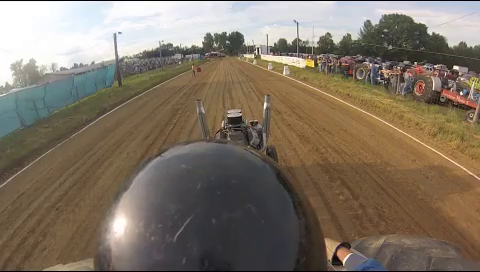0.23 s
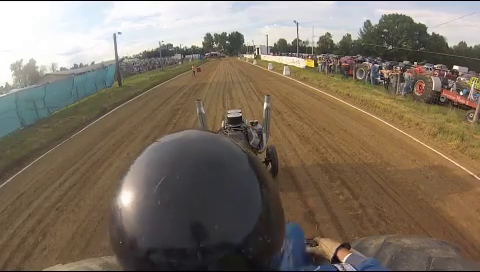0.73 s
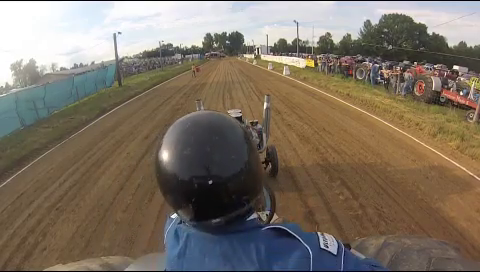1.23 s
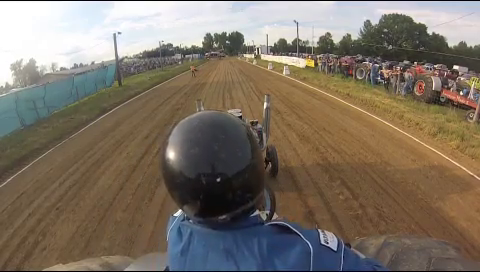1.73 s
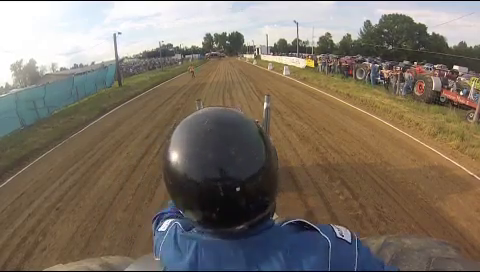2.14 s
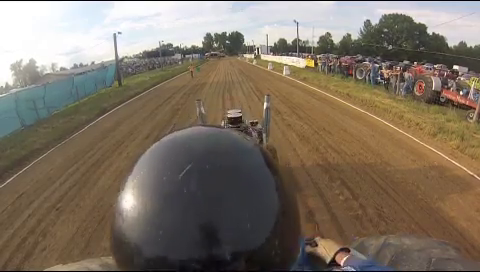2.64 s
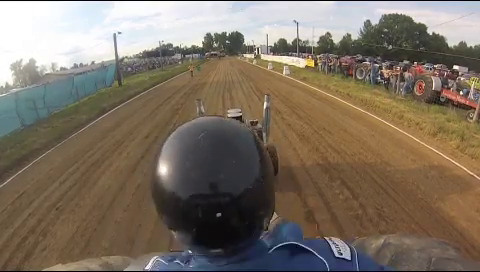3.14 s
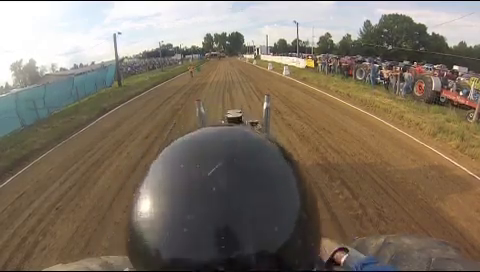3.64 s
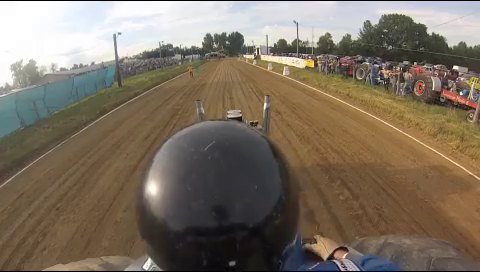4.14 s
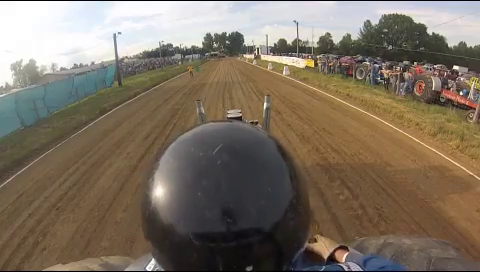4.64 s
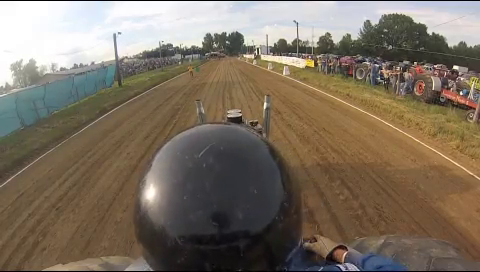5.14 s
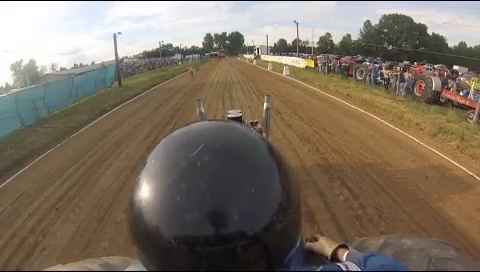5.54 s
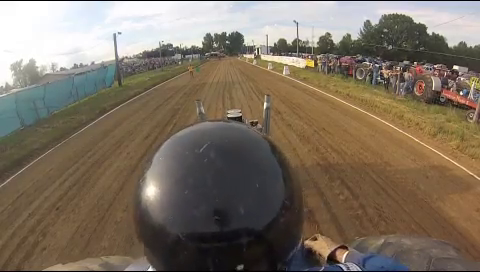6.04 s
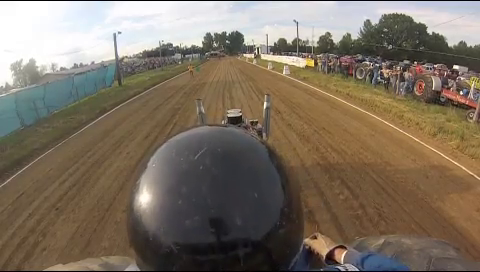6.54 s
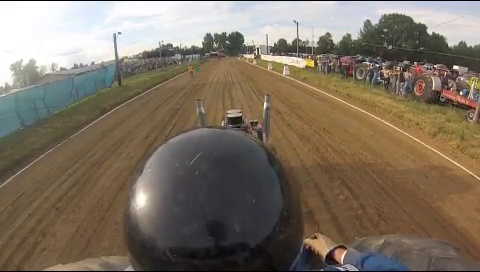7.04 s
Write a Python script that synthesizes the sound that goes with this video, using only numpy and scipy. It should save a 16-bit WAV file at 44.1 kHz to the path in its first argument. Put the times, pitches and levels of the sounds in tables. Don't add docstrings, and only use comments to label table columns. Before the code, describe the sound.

A powerful eight-cylinder tractor engine is heard from a camera clamped to the frame behind the driver, mostly as vibration through the mount into a sealed plastic case. From 0 to about 4.2 s it idles: a low, boomy drone, almost steady in pitch, with uneven swells and sags, brief singing of a thin bracket, ringing tubes, and rough gear and valve clatter. A loose part taps irregularly, with sharper ticks scattered until about 4.5 s. From roughly 4.3 s the engine picks up and its pitch climbs smoothly, while the deep boom flutters and drops back. Around 6.3 to 6.7 s a hard throttle stab drives the revs up fast; clatter, bright buzzing rattle and leaking open exhaust swell together. It ends near 7.3 s still rising, at its loudest, over twice the idle pitch. Close, dry and boxy, without echo.

```python
import sys
import numpy as np
from scipy import signal
from scipy.fft import rfft, irfft, next_fast_len
from scipy.io import wavfile
from scipy.ndimage import uniform_filter1d

SR = 44100
rng = np.random.default_rng(int(sys.argv[2]) if len(sys.argv) > 2 else 0)


def to_linear_factor(level_db):
    exponent = np.asarray(level_db, float) / 20
    return 10 ** exponent


def to_wav(s):
    ch = np.atleast_2d(s).T
    pcm = np.round(np.clip(ch, -1, 1) * 32767)
    wavfile.write(sys.argv[1], SR, pcm.astype(np.int16))


N = 321048
TIME = np.arange(N) / SR


def curves(table):
    s, *columns = np.transpose(table)
    return [np.interp(TIME, s, column) for column in columns]


def steady(x, span_s=0.2):
    k = int(span_s * SR)
    power = uniform_filter1d(uniform_filter1d(x ** 2, k), k)
    return x / np.sqrt(power + 1e-18)


def unit(x):
    return x / np.sqrt(np.mean(x ** 2))


def band(x, low_hz, high_hz):
    return signal.sosfilt(signal.butter(3, [low_hz, high_hz], "bandpass", fs=SR, output="sos"), x)


def ring(x, hz, width_hz):
    return signal.lfilter(*signal.iirpeak(hz, hz / width_hz, fs=SR), x)


def rings(x, modes):
    total = 0
    for k, (hz, width_hz, db) in enumerate(modes):
        total = total + (-1) ** k * to_linear_factor(db) * ring(x, hz, width_hz)
    return total


def decay(x, fall_s):
    return signal.lfilter([1], [1, -np.exp(-1 / (fall_s * SR))], x)


def colour(x, points):
    hz, db = np.transpose(points)
    size = next_fast_len(N)
    log_hz = np.log(np.arange(1, size // 2 + 2) * SR / size)
    gain = to_linear_factor(np.interp(log_hz, np.log(hz), db))
    return irfft(rfft(x, size) * gain, size)[:N]


def walk(rate):
    knots = rng.standard_normal(int(N / SR * rate) + 2)
    return 1.2 * np.interp(TIME * rate, np.arange(len(knots)), knots)


def bumps(rows):
    return sum(db * np.exp(-((TIME - s) / half_s) ** 2) for s, db, half_s in rows)


# [t/s, firing rate f/Hz]
REVS = [(0.0, 119.1), (0.3, 119.3), (0.9, 116.9), (1.3, 117.1), (1.8, 116.6), (2.5, 118.4), (3.05, 117.5),
        (3.6, 118.1), (4.0, 118.5), (4.25, 121.3), (4.72, 137.5), (5.25, 153.7), (5.8, 167.8),
        (6.16, 174.3), (6.32, 179.4), (6.68, 223.2), (6.96, 249.5), (7.28, 268.7)]


def firing_rate():
    return curves(REVS)[0]


def octaves():
    return np.log2(firing_rate() / REVS[0][1])


# [t/s, opening 0-1]
THROTTLE = [
    (0, 0.03),
    (4.2, 0),
    (4.55, 0.12),
    (5.6, .15),
    (6.3, 0.24),
    (6.72, 0.71),
    (6.9, 0.68),
    (7.28, 1),
]


def law(idle_db, octave_db, open_db):
    return idle_db + octave_db * octaves() + open_db * curves(THROTTLE)[0]


def harmonics(firings, table, wander_db):
    total = 0
    for k, db in table:
        level = to_linear_factor(db + wander_db * walk(10))
        total = total + level * np.sin(2 * np.pi * (k * firings / 8 + rng.random()))
    return total


def crests(crest, lines, floor_db):
    hz, below_hz, above_hz = crest
    power = to_linear_factor(floor_db) ** 2
    for k, db in lines:
        off_hz = np.round(k) * firing_rate() / 8 - hz
        skirt_hz = np.where(off_hz < 0, below_hz, above_hz)
        power = power + to_linear_factor(db) ** 2 / (1 + (off_hz / skirt_hz) ** 2) ** 2
    return np.sqrt(power)


# [multiple of the eight-firing cycle, level/dB]
SHAKE_LINES = [(1, -10), (2, -8), (3, -18), (4, -6), (5, -9), (6, -7), (7, -11), (8, 0), (9, -11),
               (10, -11), (11, -18), (12, -14), (14, -14), (16, -7), (18, -14), (20, -17), (21, -15),
               (22, -14), (23, -18), (24, -13), (26, -14), (28, -17), (29, -18), (30, -16), (32, -14)]


def shake(firings, load_db=3):
    noise = unit(band(rng.standard_normal(N), 15, 900))
    rumble = to_linear_factor(-2.5 - load_db * octaves()) * noise
    force = harmonics(firings, SHAKE_LINES, wander_db=2.2) + rumble
    return signal.lfilter(*signal.iirnotch(149, 5, fs=SR), force)


# [multiple of the cycle, level/dB at the crest]
ARM_LINES = [(2, -38), (1, -40)]


def arm(force):
    hz = 29.7
    sway = steady(ring(ring(ring(force, hz, 3.6), hz, 7), hz, 12))
    gain = crests((30, 2.76, 3.1), ARM_LINES, law(idle_db=-48, octave_db=1.5, open_db=1.5))
    gather_db = -14 * np.exp(-TIME / 1.6)
    return band(sway * gain * to_linear_factor(gather_db + walk(7)), 15, 35)


# [multiple of the cycle, level/dB at the crest]
MOUNT_LINES = [(8, -17.5), (7, -30), (6, -37.5), (5, -20), (4, -19)]
# [t/s, level/dB, half length/s]
STUMBLES = [(.37, -1.5, 0.041), (1.34, -1.5, .06), (1.53, -2, 0.063), (1.71, 0, 0.055), (2.12, -3.5, 0.033),
            (2.39, -3.5, 0.041), (2.6, -9.5, .04), (2.86, -5, 0.043), (3.06, -1, 0.044), (3.21, -3, 0.046),
            (3.47, -3, 0.049), (3.65, -4.5, 0.056), (3.99, -5, 0.025), (4.17, -4, 0.11), (4.54, -9, 0.089),
            (4.78, -12, .04), (5.13, -6, .03), (5.29, -9, 0.029), (5.37, -13, .025), (5.45, -18, .025),
            (5.54, -19, 0.032), (5.75, -8, 0.043), (6.0, -20, 0.022), (6.18, -3, .03), (6.26, 0.5, 0.034),
            (6.37, -11, .03), (6.47, -9.5, 0.036), (6.61, 1, .035), (6.73, -4, 0.025), (6.85, -8, 0.017)]
# [t/s, level/dB, half length/s]
SURGES = [
    (0.446, 2, .05),
    (1.415, 2.5, 0.036),
    (1.635, 4, 0.025),
    (2.24, 2.5, 0.27),
    (2.48, 2, .05),
    (2.933, 3, .04),
    (4.66, 4, 0.022),
    (6.126, 2.5, .04),
    (6.681, 5.5, 0.03),
]


def mount(force, firings):
    hz = 119.8
    lead = np.searchsorted(firings, 32)
    running = np.r_[force[:lead], force]
    boom = steady(ring(ring(running, hz, 11), hz, 30), 0.06)[lead:]
    gain = crests((126.7, 8.35, 3.35), MOUNT_LINES, law(idle_db=-34, octave_db=5.1, open_db=3.3))
    return band(boom * gain * to_linear_factor(bumps(STUMBLES + SURGES)), 63, 450)


# [multiple of the cycle, level/dB at the crest]
BRACKET_LINES = [(18, -39), (16, -36.5), (14, -42), (12, -35), (10, -30.5), (9, -34.5)]
# [t/s, level/dB, half length/s]
BRACKET_SONGS = [(.14, 8.5, 0.068), (.5, 5.5, 0.14), (.88, 11.5, .1), (1.22, 9, 0.089), (1.45, 8.1, 0.084),
                 (1.87, 8.5, .12), (2.62, 10, 0.062), (2.74, 7, 0.054), (3.2, 4, .2), (3.75, 5.5, 0.18),
                 (4.15, 11.7, 0.16), (5.3, 5, 0.079), (6.06, 5, 0.061)]


def bracket(force):
    hz = 286
    tone = steady(ring(ring(force, hz, 4.2), hz, 59), 0.11)
    floor_db = law(idle_db=-50.5, octave_db=8.6, open_db=1.9) + bumps(BRACKET_SONGS)
    return tone * crests((287, 4.8, 18), BRACKET_LINES, floor_db)


# [f/Hz, width/Hz, level/dB]
TUBES = [(85, 5.6, 8), (161, 31, -10.5), (211, 8.6, -7.5), (248, 19.2, -3), (461.2, 18.5, -1),
         (480, 15, -25)]
# [f/Hz, level/dB]
BETWEEN = [(45, -42), (75, -32), (170, 9.5), (330, -19.5), (600, -7), (900, -11), (1600, -24.5),
           (2400, -1.5), (2900, -5), (3500, -28)]


def tubes(force):
    ringing = unit(band(rings(force, TUBES), 97, 920))
    passed = unit(colour(force, BETWEEN[:5] + [(900, 0.5)]))
    level_db = law(idle_db=-46.5, octave_db=8.38, open_db=2) + 5.5
    return to_linear_factor(level_db) * steady(ringing + to_linear_factor(2) * passed, 0.83)


def frame(firings):
    force = shake(firings)
    return arm(force) + mount(force, firings) + bracket(force) + tubes(force)


# [share of the cycle, level/dB]
VALVE_KNOCKS = [
    (.09, -7),
    (.2, 0),
    (.39, 0),
    (.44, -7),
    (.62, -8),
    (.85, -3),
    (.93, -5),
]


def valves(firings):
    share, db = np.transpose(VALVE_KNOCKS)
    cycles = np.arange(int(firings[-1] / 8) + 1)[:, None]
    chance = rng.standard_normal((2, len(cycles), len(share)))
    at = np.searchsorted(firings / 8, cycles + share + 0.003 * chance[0])
    knocks = np.zeros(N + 1)
    knocks[at] = to_linear_factor(db + 1.2 * chance[1])
    return knocks[:N]


WALL_HZ = [723, 960, 1099, 1345, 1508, 1850, 2108, 2229, 2295, 2404, 2730]
# [width/Hz, level/dB]
WALLS = [(35.4, -2.5), (21.3, -2.5), (24.2, -2.5), (70, -0.5), (48, -3.5), (84, 0), (26.3, -3), (41, 1.5),
         (50.7, -8.5), (45, -15.5), (23.8, 1)]


def case_walls(roar, knocks):
    hits = steady(band(knocks, 2050, 2550)) * np.sqrt(650 / (SR / 2))
    drive = roar + to_linear_factor(6) * hits
    modes = [(hz, *wall) for hz, wall in zip(WALL_HZ, WALLS)]
    ringing = unit(band(rings(drive, modes), 222, 6050))
    skirt = [(300, 1.5)] + BETWEEN[4:] + [(6000, -35), (11000, -55)]
    passed = unit(colour(drive, skirt))
    return to_linear_factor(law(idle_db=-37.5, octave_db=8.76, open_db=1.4)) * steady(ringing + to_linear_factor(-8.5) * passed)


# [f/Hz, width/Hz, level/dB]
LID = [(3290, 17, 2), (3617, 90, 5), (3968, 58, 3.5), (4300, 63, -4), (4590, 17, 4.5), (5010, 67, -1.5),
       (5614, 34, 5.5), (6600, 90, 10.5)]


def case_lid(roar):
    ringing = unit(band(rings(roar, LID), 3140, 5620))
    passed = unit(band(roar, 2600, 6220))
    return to_linear_factor(law(idle_db=-55, octave_db=4.2, open_db=14.5)) * steady(ringing + passed)


def clatter(firings):
    knocks = valves(firings)
    shiver = steady(decay(knocks, 0.003))
    low, high = (1 + 0.14 * shiver) * rng.standard_normal((2, N))
    return case_walls(low, knocks) + case_lid(high)


# [t/s, depth/dB on every 3rd tap, every 4th, every 5th, every 8th]
BOUNCE = [
    (0, 2, 0.1, 6, 0.1),
    (4.3, 2, 0.1, 6, .1),
    (5, 4, 0.1, 2, .1),
    (5.4, 1, 3.5, 1, .1),
    (6.6, 0.1, 5, .1, .1),
    (7, .1, 3, .1, 3),
    (7.28, .1, 3, .1, 3),
]
# [f/Hz, level/dB]
TICK = [(4500, -14), (5650, -1), (6100, -2), (7300, -3.5), (8000, 2), (8700, -7.5), (9150, -1.5),
        (9750, -7.5), (11100, 0), (12200, -7.5), (13200, -9), (13700, -24), (14500, -2), (15300, -20)]
# [t/s, level/dB, half length/s]
RESTS = [(.02, 5, 0.018), (.2, -7, 0.017), (.3, -9, 0.022), (.42, -4, 0.017), (.53, -4, 0.071),
         (.78, -10, 0.017), (.97, -11, 0.018), (1.05, -2, 0.022), (1.22, -6, 0.11), (1.42, -10, 0.048),
         (1.65, -16, 0.023), (1.96, -8, 0.037), (2.17, -5, 0.026), (2.28, -11, 0.028), (2.47, -27, 0.034),
         (2.78, -8, 0.058), (2.97, -6, 0.026), (3.26, 0, 0.045), (3.42, -7, 0.033), (3.86, -1.5, 0.046),
         (4.1, -4, .035), (4.3, -11, .025), (.16, 4.5, 0.024), (.35, 5, 0.024), (1.31, 5, 0.052),
         (1.54, 1, 0.046), (1.83, -4, .05), (3.49, 4, 0.025), (3.97, 4, .05), (4.19, 5, .05)]


def rattle(firings, scatter_db=4.0, hiss_db=-20, seat_db=-12, seat_climb_db=10):
    count = np.arange(1, int(firings[-1]))
    chance = rng.standard_normal((len(count), 2)).T
    at = np.clip(np.searchsorted(firings, count + 0.37 + 0.12 * chance[0]), 0, N - 1)
    size_db = scatter_db * chance[1]
    for every, depth_db in zip((3, 4, 5, 8), curves(BOUNCE)):
        phase = 2 * np.pi * count / every + 1.1 * walk(2)[at]
        size_db = size_db + depth_db[at] * np.cos(phase)
    taps = np.zeros(N)
    taps[at] = to_linear_factor(size_db)
    envelope = uniform_filter1d(decay(taps, 0.0022), 50)
    knocks = (steady(envelope, 0.072) + to_linear_factor(hiss_db)) * rng.standard_normal(N)
    seat_hz = 5660
    song = steady(ring(ring(knocks, seat_hz, 640), seat_hz, 2200), 0.51)
    seat = to_linear_factor(seat_db + seat_climb_db * octaves()) * song
    level_db = law(idle_db=-57.5, octave_db=2.5, open_db=16.8) + bumps(RESTS)
    return to_linear_factor(level_db) * (steady(colour(knocks, TICK)) + seat)


# [t/s, peak level/dB]
LANDINGS = [(0.0792, -44), (0.1201, -56), (0.249, -43), (0.3242, -51), (0.4572, -39), (0.4828, -46),
            (0.5926, -52), (0.6355, -43), (1.155, -43), (1.2845, -41), (1.508, -39), (1.583, -39),
            (1.6691, -45), (1.704, -45), (1.7983, -35.5), (1.8317, -39), (2.0906, -42), (2.3615, -45),
            (2.4344, -42.5), (2.4864, -38.5), (2.7246, -44), (3.0894, -51), (3.1407, -46), (3.3378, -49),
            (3.6135, -47), (3.699, -42), (4.2573, -43), (4.3465, -41), (4.4258, -39), (4.5488, -43)]


def landings():
    s, db = np.transpose(LANDINGS)
    taps = np.zeros(N)
    taps[(s * SR).astype(int)] = to_linear_factor(db - 4)
    envelope = uniform_filter1d(decay(taps, 0.0053), 24)
    tick = colour(envelope * rng.standard_normal(N), TICK)
    return tick * np.sqrt(np.mean(envelope ** 2) / np.mean(tick ** 2))


# [multiple of the cycle, level/dB]
STACK_LINES = [(5, 12), (6, -4), (7, -6), (9, -2), (11, -9), (12, -6), (14, -12), (16, 4), (18, -5),
               (20, -7), (21, -8), (22, -6), (23, -8), (24, -6), (26, -7), (28, -8), (30, -7), (32, -1),
               (33, -6), (34, 0), (35, -9), (38, -7), (40, -5), (42, -4), (44, -6), (46, -4), (48, -6)]
# [f/Hz, level/dB]
LEAK = [(200, -4), (300, -3), (350, -9), (420, -3), (458, 6), (500, -1), (545, 0), (600, -6), (720, -2),
        (850, -6), (1000, -4), (1100, 3), (1180, -4), (1350, 2)]


def stacks(firings):
    note = colour(harmonics(firings, STACK_LINES, wander_db=1.5), LEAK)
    return to_linear_factor(law(idle_db=-68, octave_db=22, open_db=2.78)) * note


def scene():
    firings = np.cumsum(firing_rate()) / SR
    engine = frame(firings) + clatter(firings)
    loose_part = rattle(firings) + landings()
    return (engine + loose_part + stacks(firings))[None]


def band_limit(x):
    return signal.sosfilt(signal.butter(12, 15540, fs=SR, output="sos"), x)


def record(dry):
    top_cut = signal.ellip(8, 0.2, 60, 15150, fs=SR, output="sos")
    mix = signal.sosfilt(top_cut, dry)
    return band_limit(mix)


dry = scene()
out = record(dry)
to_wav(out)
```